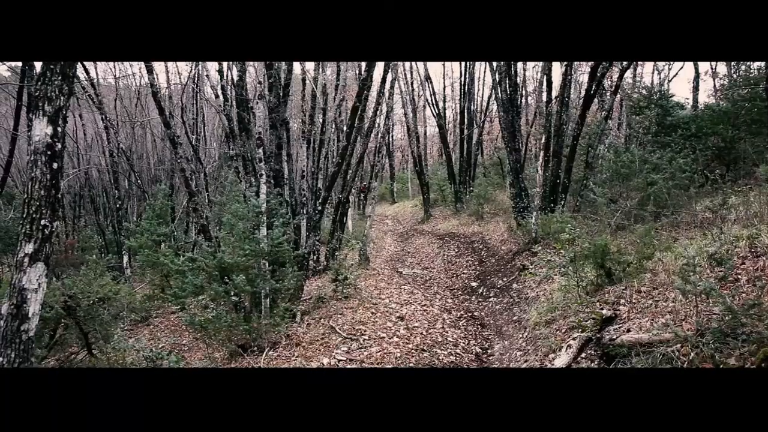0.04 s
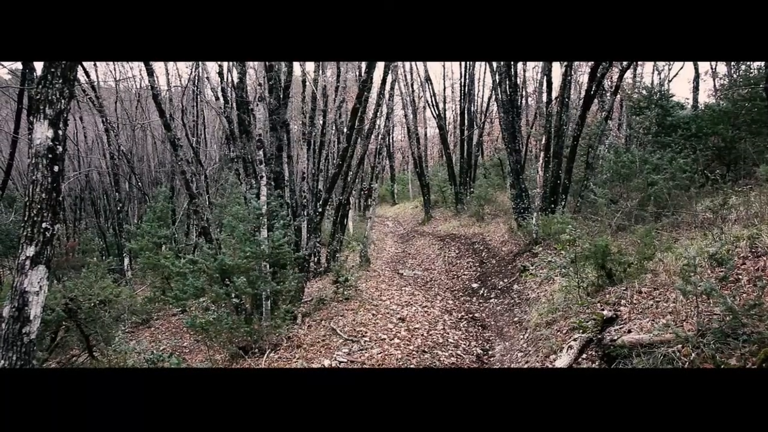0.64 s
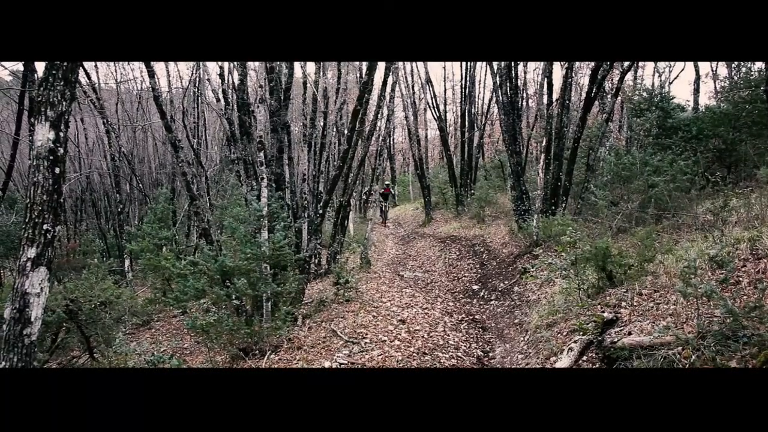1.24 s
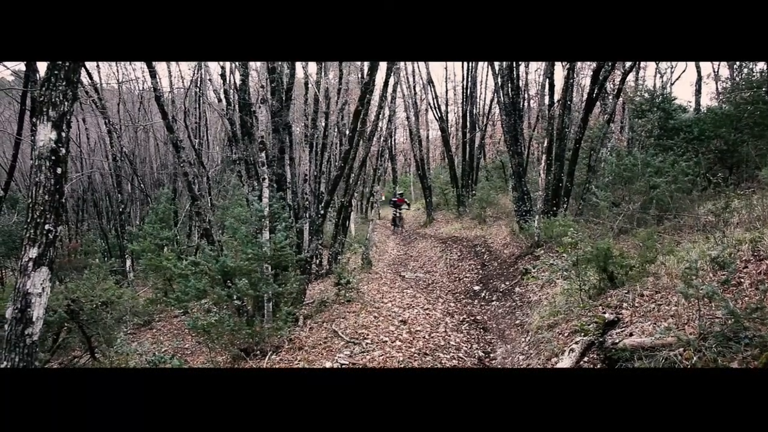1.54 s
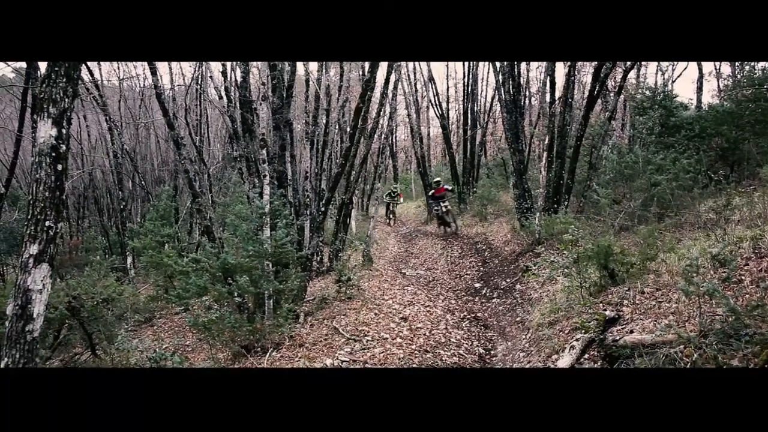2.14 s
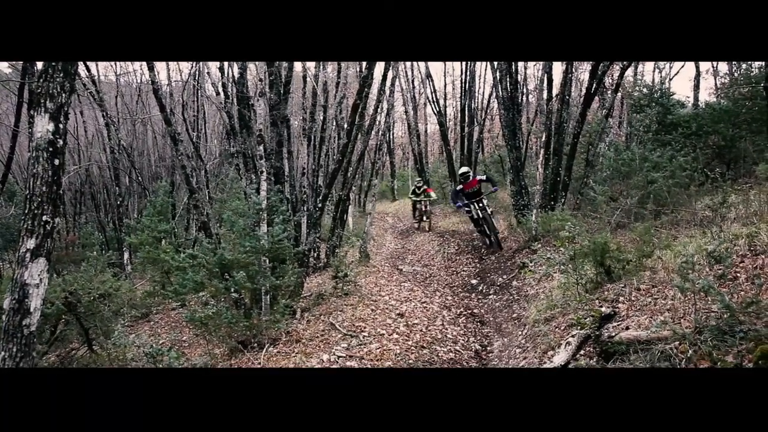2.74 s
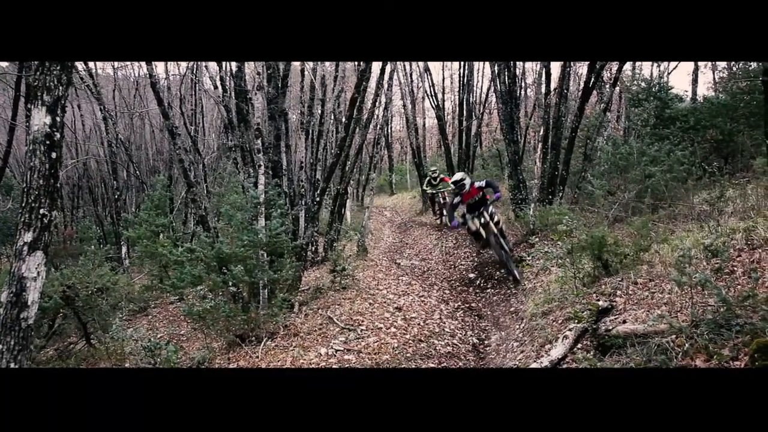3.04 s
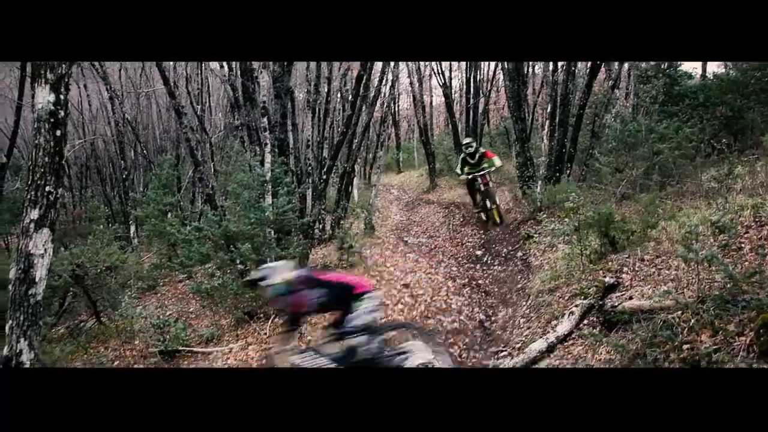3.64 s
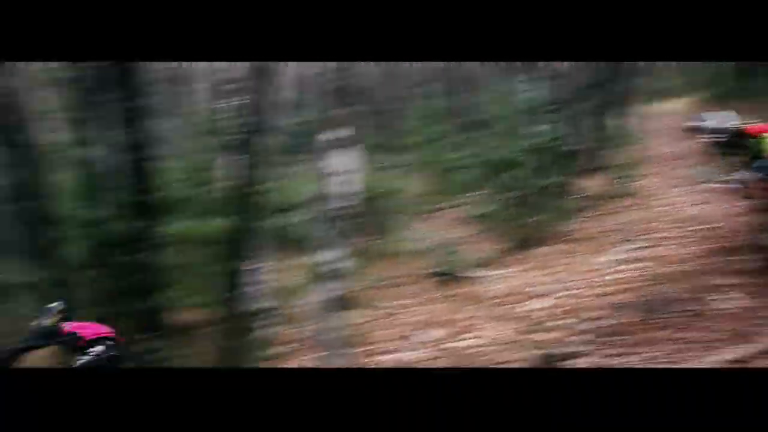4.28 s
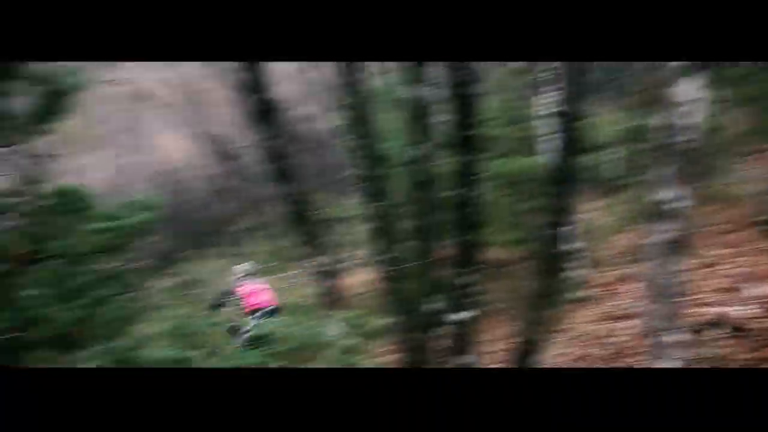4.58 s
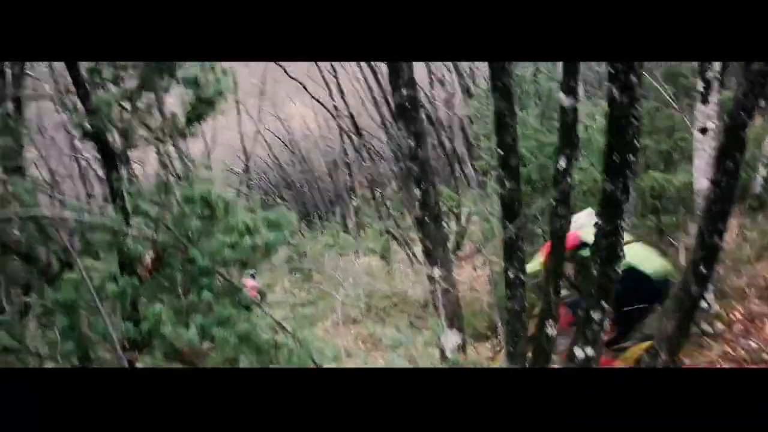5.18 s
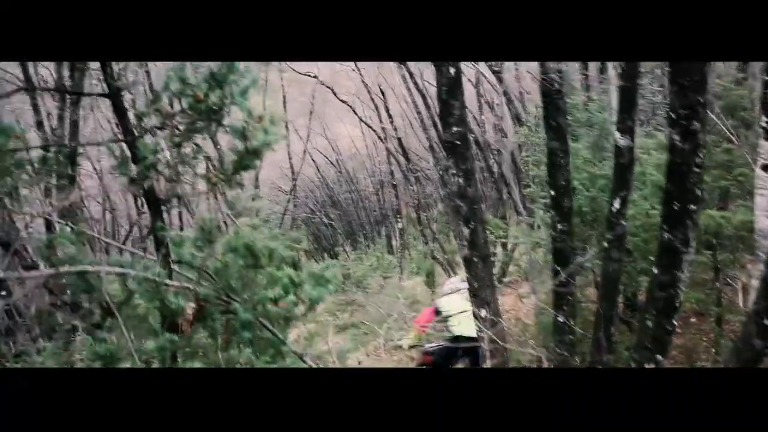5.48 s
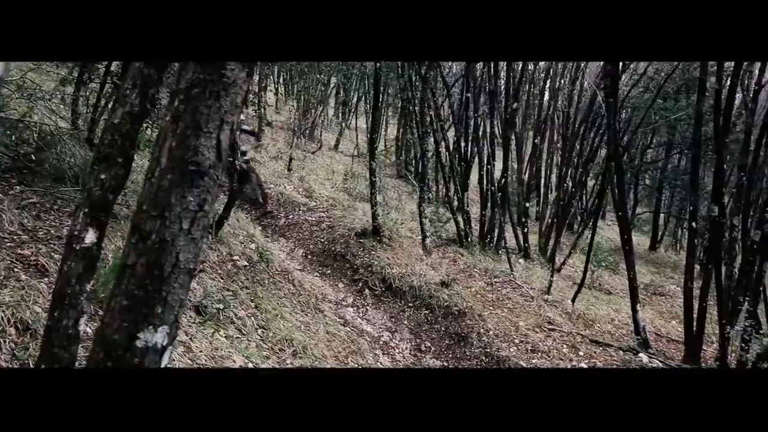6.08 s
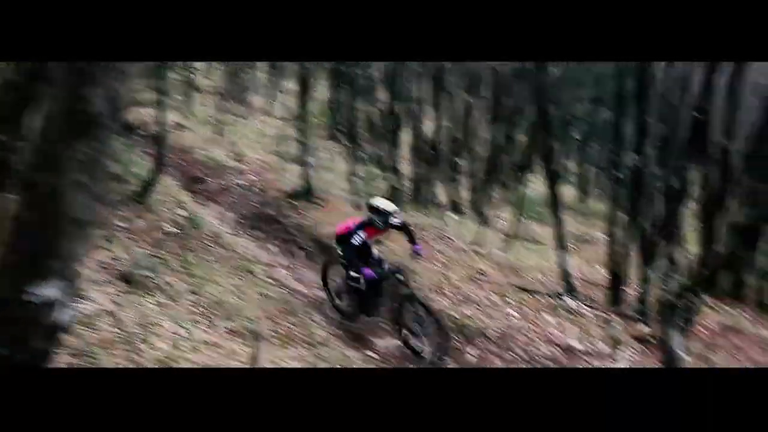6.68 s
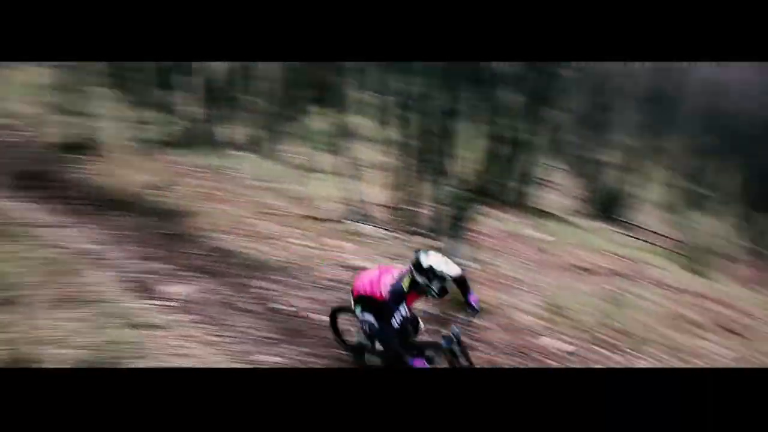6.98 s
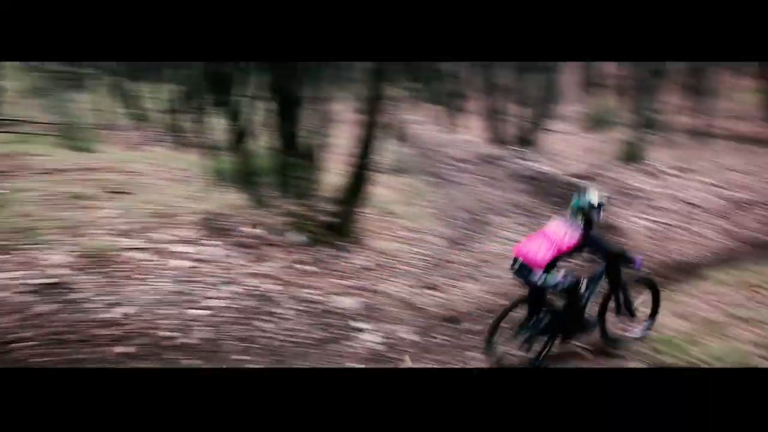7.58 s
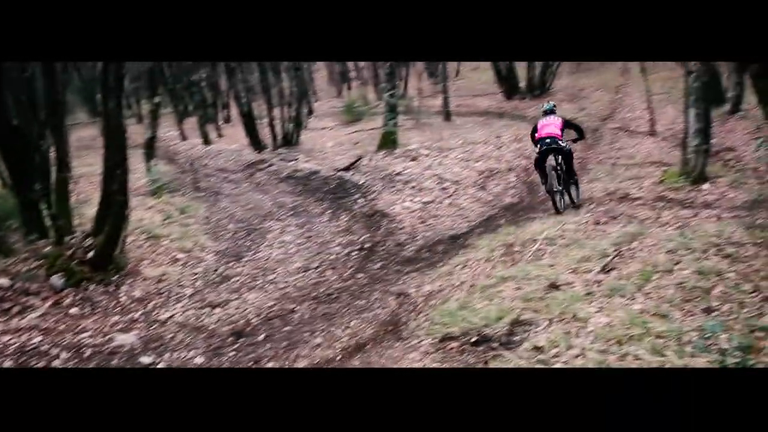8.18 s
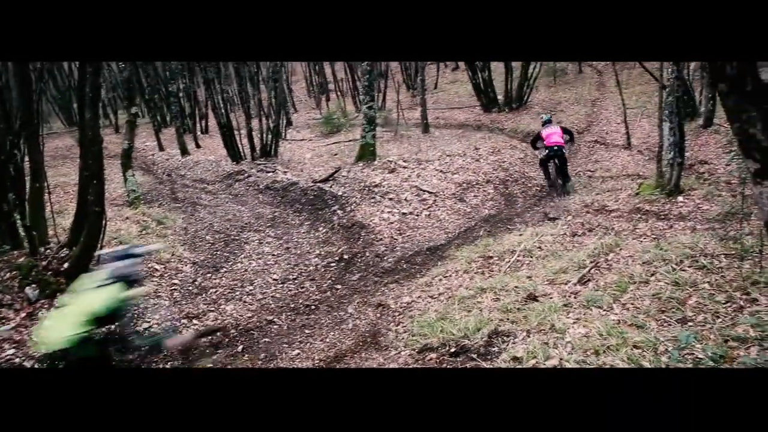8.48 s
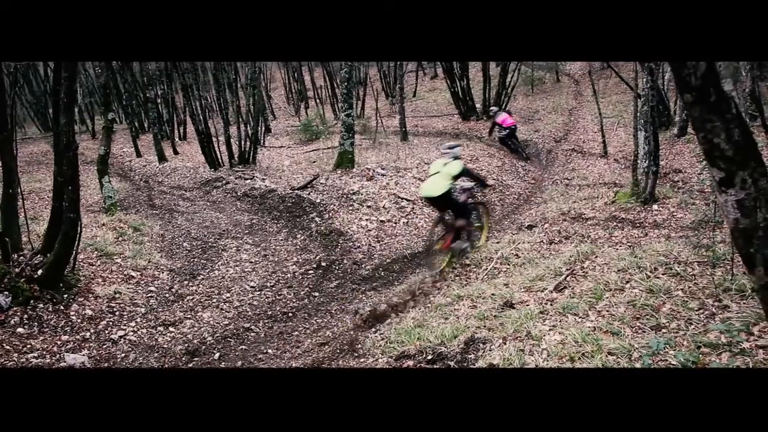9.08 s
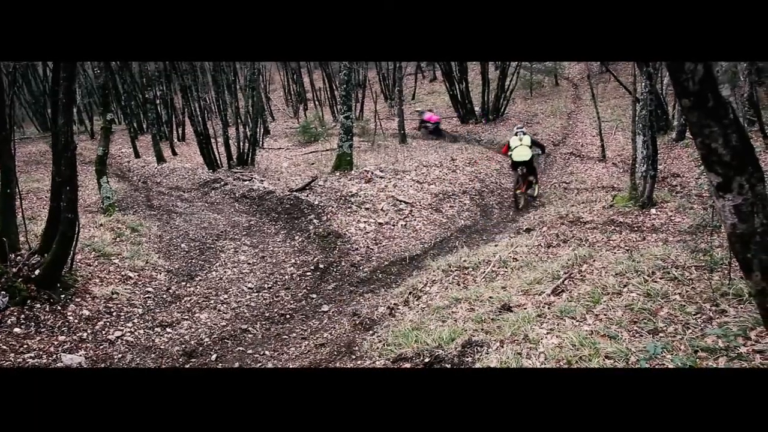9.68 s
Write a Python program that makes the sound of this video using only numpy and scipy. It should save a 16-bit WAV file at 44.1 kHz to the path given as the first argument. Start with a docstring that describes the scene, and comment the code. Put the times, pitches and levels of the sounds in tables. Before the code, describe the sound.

Bicycle tyres draw near over leaves and grit, then two coasting bikes rattle past twice and fade among the trees.

```python
"""Two mountain bikes coast down a leafy dirt trail in a wood and pass close by, twice (right channel only).
First the tyres draw near: they rumble, grind grit and crush dry leaves, harder at every bump.
From about 3 to 6 s the bikes go by: chains, stones and twigs clack, the freehubs (the ratchets in the
rear wheels) sizzle, and the tyres' rubber knobs buzz in a bend. From about 6.5 to 9 s both pass again.
Last, dead wood gives a few hollow knocks as the tyres fade among the faintly echoing trees."""
import sys
import numpy as np
from scipy import signal
from scipy.fft import rfft, irfft, next_fast_len
from scipy.io import wavfile
from scipy.ndimage import uniform_filter1d

SR = 44100
rng = np.random.default_rng(int(sys.argv[2]) if len(sys.argv) > 2 else 0)


def inscribe(sig):
    """Save sig as 16-bit PCM at rate SR to the path in sys.argv[1].

    A 1-D sig is mono; a 2-D sig holds one channel per row.
    Samples are clipped to [-1, 1] before scaling.
    """
    pcm = np.round(np.clip(np.atleast_2d(sig).T, -1, 1) * 32767)
    wavfile.write(sys.argv[1], SR, pcm.astype(np.int16))


N = 433503
TIME = np.arange(N) / SR


# the tone of the tyre's rubber body, of grit and of dry leaves: (frequency [Hz], level [dB])
RUMBLE_TONE = [(10, -9), (28, -7), (55, -0.5), (100, 3.5), (140, 0), (200, 2), (290, -2), (375, -12.5),
               (520, -8), (1500, -51)]
GRIT_TONE = [(120, -21), (300, -18.5), (450, -3.5), (600, 0), (800, -0.5), (1200, -0.7), (1700, 0),
             (2500, -0.8), (3300, -3), (4800, -5.5), (8000, -5), (16000, -51)]
LEAF_TONE = [(800, -6.5), (2200, -6.5), (3300, -10.5), (4300, -5), (5400, -1), (6400, 1.5), (7200, -1),
             (8300, -6), (9800, -13.5), (12000, -15.5), (14000, -18.5), (16000, -24)]
# how full of leaves the ruts are: (time [s], level of crushed leaves compared with a bump's grit [dB])
LEAF_COVER = [(1.4, -7), (2.4, -1), (3.3, -13), (3.75, 11), (4.2, -13), (4.7, -35), (6.1, -3.5), (7.1, 0.5),
              (7.75, -15), (8.5, -9.5), (9.8, -6)]

def tyres():
    """Rumble, grit and leaves all follow the weight on the tyre as it shakes over the ground."""
    rumble_db, grit_db, leaf_db = rolling_levels(TIME)
    starts, holds, thud_db, bite_db, scrape_hz = bumps().T
    shake = 0.56 * wander(60) + 0.96 * wander(240)
    rumble = colour(noise(), RUMBLE_TONE)
    grit = grains(380, 5400, per_s=2600, spread_db=3, sharpness=1.38) + 0.5 * noise()
    grit = colour(patchy_ground(grit, depth_db=2.5, bands=5, frames=3), GRIT_TONE)
    leaves = grains(2220, 13200, per_s=3000, spread_db=2.5, sharpness=1.9) + 0.63 * noise()
    leaves = colour(patchy_ground(leaves, depth_db=1.35, bands=14, frames=3), LEAF_TONE)
    # each bump scrapes with a hollow pitch of its own
    latest_bump = np.maximum(np.searchsorted(starts, TIME) - 1, 0)
    scrape = gliding_ring(noise(), scrape_hz[latest_bump], width_hz=600)
    bite = normalise(grit + 0.9 * scrape) * bump_gain(starts, holds, bite_db, rise_s=0.0035, fall_s=0.016)
    thuds = bump_gain(starts, holds, thud_db, rise_s=0.0063, fall_s=0.014)
    rumble *= np.hypot(amp(rumble_db + 1.67 * shake), thuds)
    grit *= amp(grit_db + 1.55 * shake)
    # leaves pressed flat under the tyre sound duller than those it whips aside
    crush = normalise(leaves + 4.3 * ring(leaves, hz=4420, sharpness=1))
    crush_db = bite_db + follow(LEAF_COVER, starts)[0]
    crush *= bump_gain(starts, holds, crush_db, rise_s=0.00089, fall_s=0.0088)
    leaves *= amp(leaf_db + 1.25 * shake + 1.16 * wander(130))
    # single stalks and brittle leaves snap above the rustle
    snaps = grains(2220, 8400, per_s=70, spread_db=0.5, sharpness=7.5)
    crackle = colour(snaps, LEAF_TONE) * amp(leaf_db - 17.5)
    return rumble + grit + bite + crush + leaves + crackle


# a wheel hits a root or rut: (time [s], hold [s], thud level [dB], grit level [dB], scrape pitch [Hz])
BIG_BUMPS = [(1.315, 0.017, -61, -62.5, 1480), (1.416, 0.028, -57, -58, 470), (1.486, .007, -53, -53, 630),
             (2.196, 0.066, -69, -56, 2700), (2.46, 0.024, -59, -50, 1430), (2.703, 0.028, -52, -48, 1360),
             (2.772, 0.0079, -45.5, -54, 2360), (3.102, 0.021, -53, -41, 1330),
             (3.159, .008, -45, -37.5, 1380), (3.187, 0.0051, -39.5, -33, 1010),
             (3.239, 0.022, -46, -40, 1390), (3.278, .008, -45, -37, 1380),
             (3.336, 0.0037, -31, -33.5, 1150), (3.415, .018, -53, -39.5, 2120),
             (3.722, 0.0029, -40, -47, 2640), (3.786, 0.0034, -40, -48, 2670),
             (4.155, 0.0099, -39, -42.5, 1770), (4.284, 0.0087, -59, -47.5, 1640),
             (4.523, 0.019, -47, -40.5, 760), (4.675, 0.066, -42, -44, 1000), (4.98, 0.015, -43, -54, 800),
             (5.23, .012, -46, -77, 1830), (5.365, 0.019, -59, -50, 860), (5.463, .008, -46, -49.5, 447),
             (5.711, 0.074, -70, -45, 840), (6.018, 0.016, -46, -50.5, 720), (6.101, 0.039, -52, -49, 760),
             (6.429, 0.012, -48.5, -52.5, 450), (6.522, 0.019, -35.5, -40.5, 2450),
             (6.625, 0.0077, -38, -39, 1380), (6.72, 0.041, -43, -41, 1070), (6.869, 0.041, -44, -36, 865),
             (7.085, 0.0038, -45, -39, 3050), (7.167, 0.015, -45, -35, 2680),
             (7.419, 0.013, -36.5, -45.5, 450), (7.476, 0.011, -35.5, -38.5, 1340),
             (7.559, 0.031, -57, -40.5, 1140), (7.63, 0.011, -43, -34, 1600), (7.766, 0.033, -38, -34, 710),
             (7.895, .005, -44, -38, 1020), (7.946, 0.023, -66, -35, 1210), (8.089, .007, -58, -37.5, 1660),
             (8.227, 0.034, -46, -36, 1770), (8.291, 0.019, -40, -38, 1610),
             (8.344, 0.033, -60, -35.5, 2670), (8.518, 0.0086, -58, -33.5, 2330),
             (8.963, 0.024, -63, -41, 2300), (9.78, 0.026, -61, -49, 900)]

def bumps(count=45, hold_s=0.0046, spread_db=10):
    """Lists the big bumps in time order with small random ones, whose level follows the rolling tyre."""
    chance = rng.random((count, 4))
    starts = (np.arange(count) + chance[:, 0]) / count * TIME[-1]
    thud, bite, octaves = 2 * chance[:, 1:].T - 1
    rumble_db, grit_db, _ = rolling_levels(starts)
    thud_db = rumble_db - 3 + spread_db * thud
    bite_db = grit_db - 3 + spread_db * bite
    small_bumps = np.transpose([starts, np.full(count, hold_s), thud_db, bite_db, 1410 * 2 ** octaves])
    rows = np.vstack([BIG_BUMPS, small_bumps])
    return rows[np.argsort(rows[:, 0])]


def bump_gain(starts, holds, levels_db, rise_s, fall_s):
    """Each bump squeezes the tyre quickly, holds and lets go."""
    power, t = np.zeros(N), np.arange(SR // 4) / SR
    for start, hold, db in zip(starts, holds, levels_db):
        squeeze = np.minimum(t / rise_s, 1) * np.exp(-np.maximum(t - hold, 0) / fall_s)
        add(power, start, (amp(db) * squeeze) ** 2)
    return np.sqrt(power)


# how loud the tyres roll, one list for each ride past: (time [s], grit level [dB], leaf level [dB])
RIDES = [
    [(0, -76, -73), (.28, -74.5, -74.5), (.46, -67, -62.5), (.8, -69.5, -69), (1.27, -72, -68),
     (1.53, -60.5, -59), (1.7, -57.5, -57), (1.95, -64.5, -62.5), (2.55, -56.5, -51.5), (3.02, -56, -51),
     (3.17, -51, -53.5), (3.7, -43, -42.5)],
    [(4.1, -52, -52), (4.6, -44.5, -47.5), (4.84, -52.5, -50.5), (5.0, -51, -44.5), (5.16, -53, -43),
     (5.33, -54, -53.5), (5.72, -52, -47.5), (6.4, -56, -57)],
    [(6.62, -42, -41.5), (6.76, -47.5, -49), (6.84, -48.5, -50), (6.98, -44.5, -47.5), (7.36, -42, -38.5),
     (7.68, -43, -38.5), (8.17, -48.5, -41)],
    [(8.45, -42, -36), (8.68, -47, -40), (8.96, -56, -36.5), (9.17, -59, -46), (9.55, -54, -48.5),
     (9.83, -58.5, -55.5)],
]

def rolling_levels(t, cushion=0.43, hop_delay_s=0.065, hop_width_s=0.015):
    """Rumble, grit and leaf levels. Deep leaves soften the rumble; all dip 1 dB in a hop off a big bump."""
    grit_db, leaf_db = follow(np.vstack(RIDES), t)
    rumble_db = grit_db - 3.5 - cushion * (leaf_db - grit_db)
    steps = TIME[::100]
    hops = [np.exp(-((steps - start - hop_delay_s) / hop_width_s) ** 2) for start, *_ in BIG_BUMPS]
    dip_db = np.interp(t, steps, np.max(hops, axis=0))
    return rumble_db - dip_db, grit_db - dip_db, leaf_db - dip_db


def grains(low_hz, high_hz, per_s, spread_db, sharpness, pitches=10):
    """Countless tiny things break, each with a click at one of several pitches; a few are loud."""
    out = np.zeros(N)
    for hz in np.geomspace(low_hz, high_hz, pitches):
        at = np.flatnonzero(rng.random(N) < per_s / pitches / SR)
        sizes = amp(spread_db * np.minimum(rng.exponential(1, N)[at], 4.5))
        clicks = np.zeros(N)
        clicks[at] = sizes * (-1.) ** at
        out += ring(clicks, hz, sharpness)
    return normalise(out)


def patchy_ground(x, depth_db, bands, frames):
    """The ground changes under the wheel, so patches of the tone briefly grow louder or softer."""
    spectrum = signal.stft(x, nperseg=1024)[2]
    patches = rng.standard_normal(spectrum.shape)
    for axis, span in enumerate((bands, frames)):  # smooth over pitch, then over time
        patches = uniform_filter1d(uniform_filter1d(patches, span, axis), span, axis)
    spectrum *= amp(depth_db * normalise(patches))
    return normalise(signal.istft(spectrum)[1][:N])


# chain slaps, flung stones and snapping twigs: (time [s], level [dB], pitch [Hz], time to fade 60 dB [s])
CLACKS = [(1.441, -35.5, 4200, 0.028), (1.64, -43, 3200, 0.021), (1.705, -31, 5600, 0.014),
          (1.881, -42, 2980, .02), (2.0583, -32.5, 6200, .018), (2.194, -31.5, 2940, .03),
          (2.6117, -30, 6400, .015), (2.9471, -23.5, 7150, .006), (2.954, -27.5, 3900, 0.044),
          (3.054, -24, 5370, 0.0085), (3.3414, -19, 4200, .035), (3.448, -25, 3160, 0.016),
          (3.54, -21.5, 4500, 0.027), (3.5972, -15, 3000, 0.0058), (3.6658, -8, 3700, 0.023),
          (3.7355, -15, 2800, 0.031), (3.917, -14.5, 4700, 0.02), (4.007, -23.5, 2830, 0.043),
          (4.0853, -22, 6300, 0.013), (4.183, -22, 3730, 0.024), (4.6954, -19.5, 2300, 0.029),
          (4.9205, -21, 2680, .023), (5.176, -21, 2300, 0.013), (5.767, -26, 6800, .012),
          (6.1267, -22, 2340, 0.027), (6.164, -24, 7500, .008), (6.445, -26, 5260, 0.016),
          (6.543, -15, 4400, 0.03), (6.654, -10.5, 3330, 0.024), (6.878, -16.5, 5700, 0.054),
          (6.9983, -17.5, 2830, 0.024), (7.1287, -14.5, 5150, 0.034), (7.2742, -13, 5400, .021),
          (7.3675, -9, 5530, .011), (7.3964, -14.5, 6800, .014), (7.6315, -6, 5450, 0.015),
          (7.784, -7.5, 4030, 0.0066), (7.8092, -14.5, 4260, 0.026), (7.8875, -11, 3150, 0.0044),
          (7.945, -16.5, 4800, 0.044), (8.0444, -11, 4700, 0.0086), (8.0802, -16.5, 5300, 0.0052),
          (8.2465, -5.5, 1780, 0.032), (8.411, -5, 5000, 0.014), (8.823, -15, 7100, 0.017),
          (8.929, -15.5, 2180, 0.04), (8.9569, -12.5, 2930, 0.0064), (8.9737, -16.5, 4020, .02)]
# the notes at which the bike frame and chain ring: (pitch [Hz], level [dB])
FRAME_NOTES = [(1720, -8), (2250, -9.5), (2640, -8), (3750, -11.5), (5100, -17), (5850, -10), (7000, -5)]

def clacks(reach_octaves=0.34):
    """Each hit makes a sharp crack and a short rattle, and rings the frame notes near its own pitch."""
    out, t = np.zeros(N), np.arange(SR // 16) / SR - 0.001
    after = np.maximum(t, 0)
    for start, db, hz, fade_s in CLACKS:
        crack = np.cos(2 * np.pi * hz * t) * np.exp(-(hz * t / 0.71) ** 2)
        rattle = normalise(ring(ring(noise(len(t)), hz, 1.14), hz, 1.14)) * (t > 0)
        tone = np.zeros(len(t))
        for note_hz, note_db in FRAME_NOTES:
            closeness = np.exp(-(np.log2(note_hz / hz) / reach_octaves) ** 2)
            tone += amp(note_db) * closeness * np.sin(2 * np.pi * note_hz * after)
        fade = amp(-60 * after / fade_s)
        add(out, start + t[0], amp(db) * (0.45 * crack + (0.25 * rattle + 0.83 * tone) * fade))
    return signal.sosfilt(signal.butter(4, 9500, fs=SR, output="sos"), out)


# a bike coasts by: (start [s], time when nearest [s], end [s], nearest distance [m], level there [dB])
COASTS = [(0, 4.7, 3.9, 3.7, -56), (4.8, 5.06, 6.05, 2.6, -48), (6.3, 8.1, 9.9, 2, -51),
          (6.3, 12, 12, 4, -75)]
BIKE_M_PER_S, SOUND_M_PER_S = 9, 343

def freehubs(teeth_per_s=290, shell_hz=6360, sizzle_hz=6000):
    """Small catches tick over teeth and ring the hub's shell: louder when near, higher on the way in."""
    out = np.zeros(N)
    for start, nearest, end, distance, db in COASTS:
        along = BIKE_M_PER_S * (TIME - nearest)
        away = np.hypot(along, distance)
        doppler = 1 / (1 + BIKE_M_PER_S / SOUND_M_PER_S * along / away)  # motion shifts the pitch
        tick_rate = teeth_per_s * doppler * (1 + 0.11 * wander(3.4))
        teeth_passed = np.floor(np.cumsum(tick_rate) / SR)
        ticks = np.diff(teeth_passed, prepend=0) * noise()
        shell = gliding_ring(ticks, shell_hz * doppler, width_hz=560)
        sizzle = amp(-7) * gliding_ring(ticks, sizzle_hz * doppler, width_hz=3100)
        fade = np.clip(np.minimum(TIME - start, end - TIME) / 0.05, 0, 1)
        out += amp(db) * distance / away * fade * normalise(shell + sizzle)
    return out


# a tyre leans into a bend: (time [s], length [s], average knob slaps [per s], level [dB])
BENDS = [(4.522, .13, 245, -43.5), (4.662, .13, 215, -48), (5.722, 0.091, 310, -48.5),
         (7.295, 0.36, 300, -59), (7.752, 0.086, 315, -41), (7.998, .8, 305, -54.5), (8.2, 0.82, 504, -57)]

def tyre_knobs(pitch_sag=0.0865):
    """Rubber knobs slap the ground in an uneven buzz that swells, fades and sags in pitch."""
    out, slip, grip = np.zeros(N), wander(163), wander(86.2)
    for start, length, hz, db in BENDS:
        progress = np.arange(0, 1, 1 / (length * SR))
        n = len(progress)
        slap_rate = hz * (1 - pitch_sag * (progress - 0.5)) * (1 + 0.0714 * slip[:n])
        slaps = np.cumsum(slap_rate) / SR
        buzz = sum(np.cos(2 * np.pi * k * slaps) / k ** 1.3 for k in range(1, 7))
        add(out, start, normalise(buzz) * amp(db + 4.2 * grip[:n]) * np.sin(np.pi * progress))
    return out


# hollow knocks on dead wood: (time [s], level [dB])
KNOCKS = [(9.514, -24.5), (9.526, -34), (9.562, -41)]
# the notes at which the wood rings: (pitch [Hz], level [dB], time to fade 60 dB [s])
WOOD_NOTES = [(1112, 3, 0.069), (1333, -4, 0.057), (1382, -5, 0.089), (2320, -15, .04), (3870, -3, 0.02),
              (4500, -7, 0.017)]

def wood_knocks(rise_s=0.0018):
    """Struck dead wood rings briefly with a few notes at once."""
    out, t = np.zeros(N), np.arange(SR // 6) / SR
    knock = sum(amp(db - 60 * t / fade_s) * np.sin(2 * np.pi * hz * t) for hz, db, fade_s in WOOD_NOTES)
    knock *= np.minimum(t / rise_s, 1)
    for start, db in KNOCKS:
        add(out, start, amp(db) * knock / abs(knock).max())
    return out


def tree_echoes(x, echo_db, fade_s, paths=3, echoes_per_s=1500):
    """Adds faint echoes that bounce off the trees; their paths change as the bikes move."""
    t, out = np.arange(SR // 2) / SR, x.copy()
    for k in range(paths):
        echoes = noise(len(t)) * (rng.random(len(t)) < echoes_per_s / SR)
        echoes *= (t > 0.004) * amp(-60 * t / fade_s)
        share = np.cos(np.pi * (1.303 * TIME + k / paths)) * np.sqrt(2 / paths)
        out += amp(echo_db) * signal.oaconvolve(x * share, echoes / np.linalg.norm(echoes))[:N]
    return out


# the tone of the air in the wood: (frequency [Hz], level [dB])
AIR_TONE = [(15, -10), (60, 8), (120, -7), (300, -14.5), (1000, -21), (3000, -20), (6500, -15.5),
            (10000, -32), (16000, -45)]

def air():
    """The air of the wood is a faint, low, steady hush."""
    return amp(-64.5) * colour(noise(), AIR_TONE)


def amp(db):
    """Turns decibels into a number to multiply a sound by."""
    return 10 ** (np.asarray(db) / 20)


def noise(size=N):
    """Plain white hiss."""
    return rng.standard_normal(size)


def normalise(x):
    """Scales x to an average strength (rms) of 1."""
    return x / np.sqrt(np.mean(x ** 2) + 1e-20)


def wander(per_s):
    """A random curve that heads for a new value per_s times a second."""
    points = noise(8192)
    return normalise(np.interp(TIME * per_s, np.arange(len(points)), points))


def follow(rows, t):
    """Reads a table at the times t, drawing straight lines between its rows."""
    times, *columns = np.transpose(rows)
    return [np.interp(t, times, column) for column in columns]


def add(mix, start, sound):
    """Mixes a sound in at start seconds."""
    part = mix[round(start * SR):][:len(sound)]
    part += sound[:len(part)]


def colour(x, tone):
    """Shapes the lows and highs of x by a tone table, at strength 1."""
    size = next_fast_len(N, True)
    hz, db = np.transpose(tone)
    gain = amp(np.interp(np.log(np.fft.rfftfreq(size, 1 / SR) + 1), np.log(hz), db))
    return normalise(irfft(rfft(x, size) * gain, size)[:N])


def ring(x, hz, sharpness):
    """Makes x ring at one pitch; sharper rings last longer."""
    return signal.lfilter(*signal.iirpeak(hz, sharpness, SR), x)


def gliding_ring(x, hz, width_hz):
    """Makes x ring at a pitch that follows the curve hz, at strength 1."""
    turn = np.exp(2j * np.pi * np.cumsum(hz) / SR)
    decay = np.exp(-np.pi * width_hz / SR)
    return normalise((turn * signal.lfilter([1], [1, -2 * decay, decay ** 2], x / turn)).real)


def scene():
    """The bikes among the trees; one microphone feeds the right channel only."""
    bikes = tyres() + tyre_knobs() + freehubs() + clacks() + wood_knocks()
    sound = tree_echoes(bikes, echo_db=-16.5, fade_s=0.96) + air()
    return np.array([np.zeros(N), 2 * sound])


def record(dry):
    """Adds a trace of hiss to both channels, clips at full scale and cuts the highest treble."""
    hiss = amp(-103) * noise(dry.shape)
    lowpass = signal.firwin(511, 15950, window=("kaiser", 9), fs=SR)
    return signal.oaconvolve(np.clip(dry + hiss, -1, 1), lowpass[None], "same")


dry = scene()
out = record(dry)
inscribe(out)
```